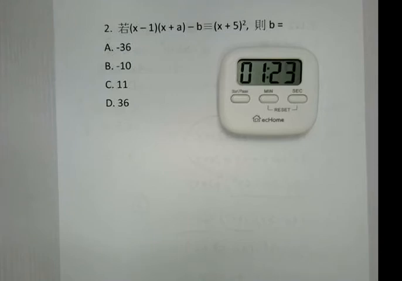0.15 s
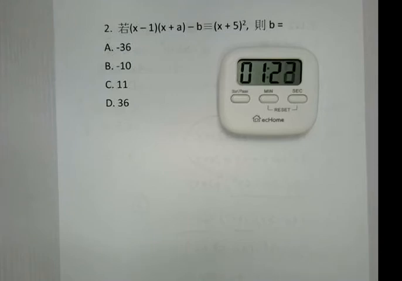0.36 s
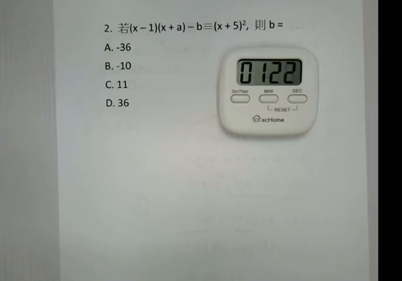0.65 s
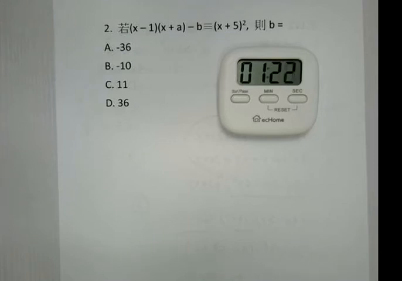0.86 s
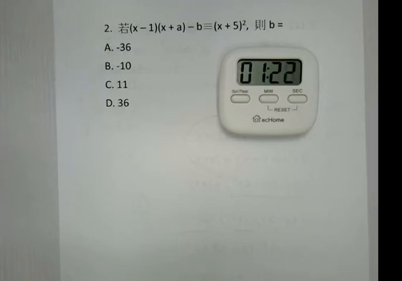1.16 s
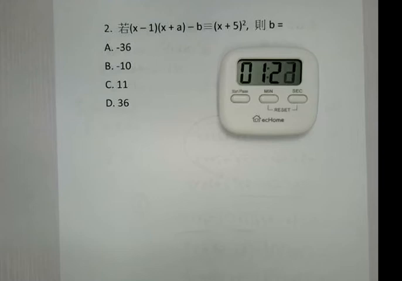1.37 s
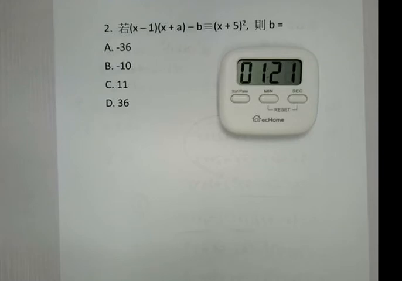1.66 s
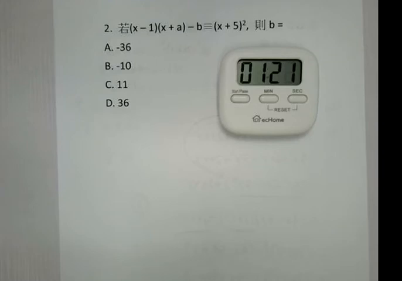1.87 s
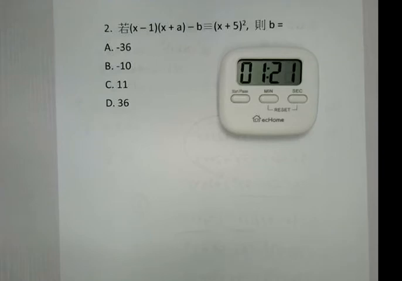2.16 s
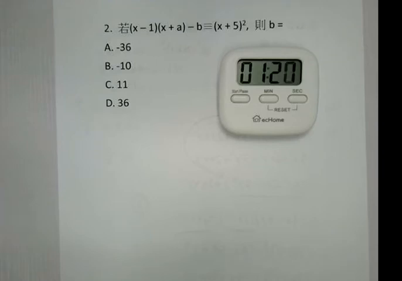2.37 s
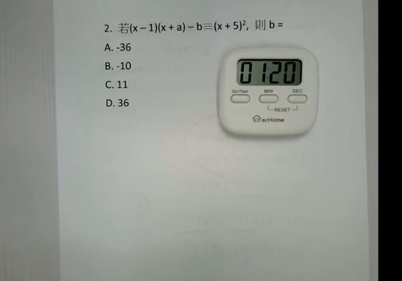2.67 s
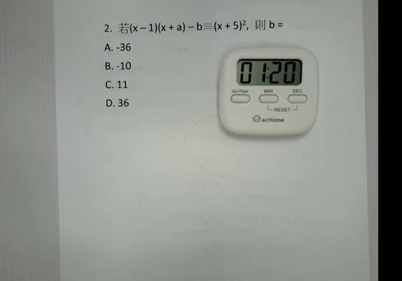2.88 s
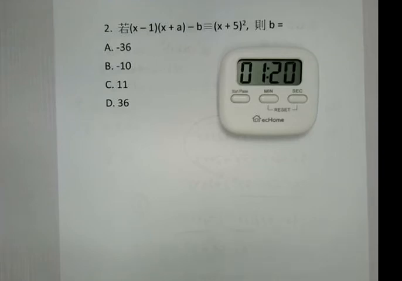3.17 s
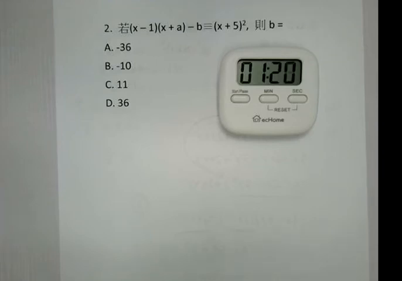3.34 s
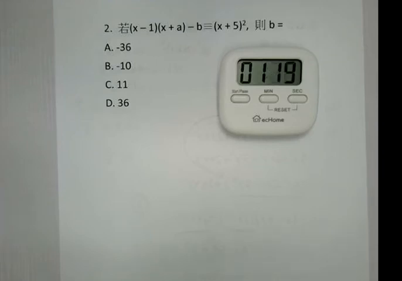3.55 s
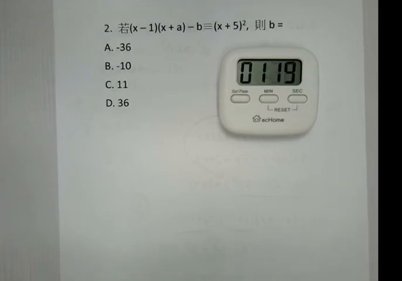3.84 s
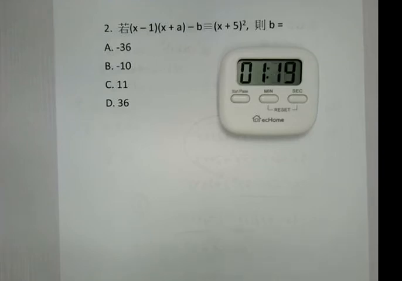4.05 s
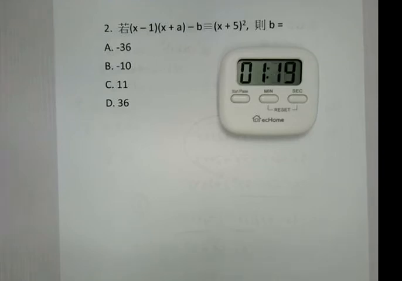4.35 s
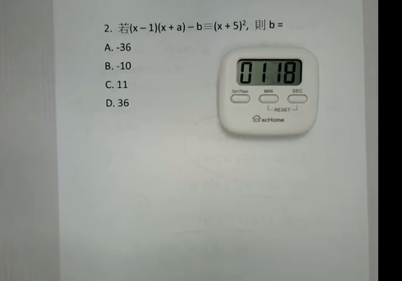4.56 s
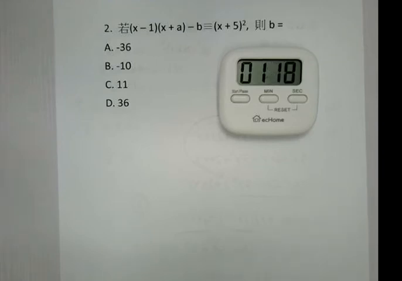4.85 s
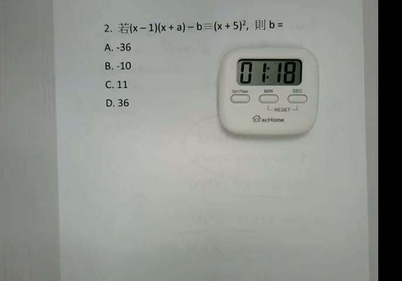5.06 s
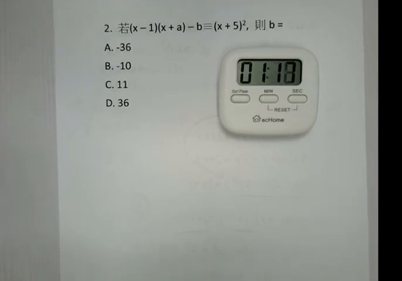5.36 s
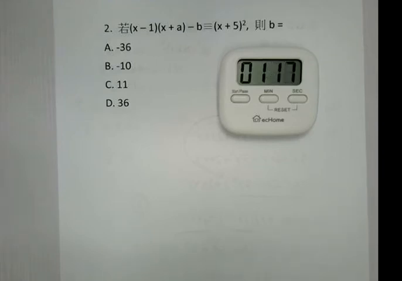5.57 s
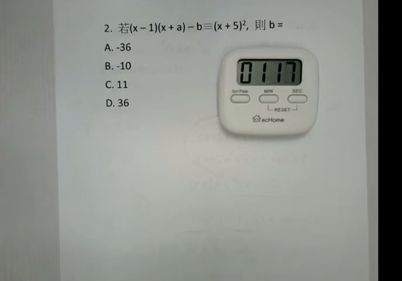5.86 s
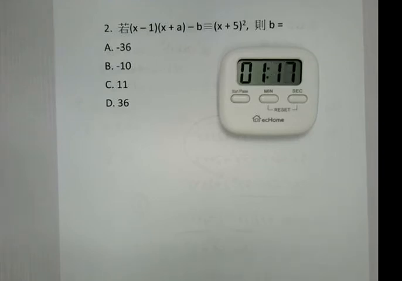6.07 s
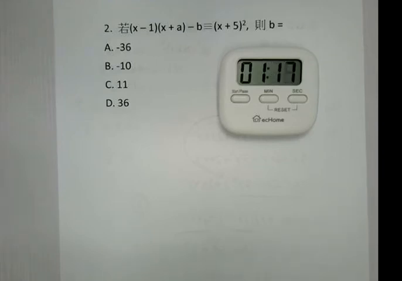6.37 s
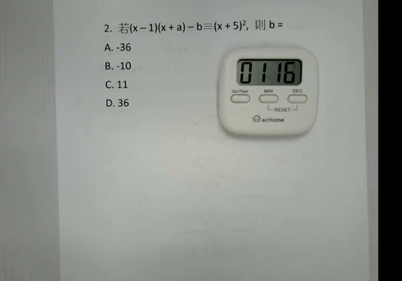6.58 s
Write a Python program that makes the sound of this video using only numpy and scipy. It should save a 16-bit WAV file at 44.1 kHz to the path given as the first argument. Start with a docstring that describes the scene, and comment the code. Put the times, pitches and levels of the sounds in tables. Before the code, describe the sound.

Quiet room heard through a plain single microphone with slight hiss. A constant deep mains hum dominates, edged by a weak raspy buzz and mixed with low, rumbling air noise. Past the middle, a soft tick is followed by a brief flurry of hard little clicks, like a small object or switch being nudged nearby, with very little room tail. Then only the steady hum and airy background remain, until a very faint tick at the close.

```python
"""A mains appliance hums and buzzes steadily in a quiet room, over a low rush of air and an even microphone
hiss. The hum is a stack of sine tones at multiples of the mains frequency; the buzz is short knocks in each
mains cycle. A few small clicks sound close by, most in one quick cluster: damped rings with a snap of noise and
a softer ring just after. There is one faint, high, rising squeak. The air and the hiss are random noise given a
tone colour."""
import sys
import numpy as np
from scipy import signal
from scipy.fft import rfft, irfft
from scipy.io import wavfile

SR = 44100
rng = np.random.default_rng(int(sys.argv[2]) if len(sys.argv) > 2 else 0)


def inscribe(sig):
    """Save sig as 16-bit PCM at rate SR to the path in sys.argv[1].

    A 1-D sig is mono; a 2-D sig holds one channel per row.
    Samples are clipped to [-1, 1] before scaling.
    """
    pcm = np.round(np.clip(np.atleast_2d(sig).T, -1, 1) * 32767)
    wavfile.write(sys.argv[1], SR, pcm.astype(np.int16))


N = 296352  # length in samples
TIME = np.arange(N) / SR  # seconds
FREQS = np.fft.rfftfreq(N, 1 / SR)  # Hz

MAINS_HZ = 49.964
CYCLE_START_S = .0122  # a mains cycle starts here


def amp(db):
    """Turns decibels into a gain."""
    return 10 ** (np.asarray(db) / 20)


def unit(x):
    """Scales a sound to an average strength (rms) of 1."""
    return x / np.sqrt(np.mean(x ** 2) + 1e-20)


def spectrum(points):
    """Joins (Hz, dB) points into a curve, with frequency spaced by its logarithm."""
    hz, db = np.transpose(points)
    return np.interp(np.log(FREQS + 1), np.log(hz), db)


def coloured(x, db):
    """Filters a sound by a dB curve and scales it to rms 1."""
    return unit(irfft(rfft(x) * amp(db), N))


def add(mix, start_s, sound):
    """Mixes a sound in at a given time, cutting it off where the mix ends."""
    part = mix[round(start_s * SR):][:len(sound)]
    part += sound[:len(part)]


def drift(rate_hz):
    """Wanders slowly at random, as noise with only its lowest frequencies left; rms 1."""
    noise = rfft(rng.standard_normal(N))
    return unit(irfft(noise * np.exp(-(FREQS / rate_hz) ** 2), N))


def hum(waver_db=0.36, waver_hz=6.1, lag_s=.0034, scatter_turns=0.008):
    """Two firm low tones follow the mains; the panel tones above crest near each knock and waver a little."""
    # Tones of the hum. Each row: multiple of the mains frequency, level in dB rms.
    hum_tones = [(1, -37.5), (2, -37.5), (4, -48.5), (6, -60), (8, -64), (10, -72.5), (13, -65.5),
                 (14, -62), (16, -67), (17, -71), (18, -72), (19, -77.5), (20, -67.5), (22, -75.5),
                 (23, -79.5), (24, -72.5), (25, -80.5), (26, -82)]
    out = np.zeros(N)
    for order, db in hum_tones:
        order = round(order)
        turns = order * MAINS_HZ * (TIME - CYCLE_START_S)
        if order <= 2:
            out += amp(db) * np.sin(2 * np.pi * turns)
        else:
            # the room scatters the phases of high tones more than those of low ones
            turns += order * (scatter_turns * rng.standard_normal() - MAINS_HZ * lag_s)
            level = amp(db + waver_db * drift(waver_hz))
            out += level * np.cos(2 * np.pi * turns)
    return np.sqrt(2) * out  # a sine of peak sqrt(2) has rms 1


def buzz(level_db=-68.5):
    """The iron core gives a double knock in each half cycle; the two halves are not quite alike."""
    # Knocks of the core. Each row: seconds after the mains cycle starts, strength (a plain factor, with sign).
    core_knocks = [(.00315, -.5), (.0041, 1), (.01325, -.5), (.0141, .85)]
    # Colour of the buzz. Each row: frequency in Hz, relative strength in dB per Hz.
    buzz_colour = [(900, -26), (1300, -4.5), (1650, -5), (1800, 1.5), (2000, 3.5), (2300, -4), (3000, -6),
                   (4200, -11), (7000, -16.5), (10000, -21), (15000, -27)]
    pulses = np.zeros(N)
    for delay_s, strength in core_knocks:
        # distance to the nearest knock, in cycles and then in samples
        cycles = (MAINS_HZ * (TIME - CYCLE_START_S - delay_s) + .5) % 1 - .5
        samples = cycles * SR / MAINS_HZ
        # a smooth spike that may fall between two samples
        pulses += strength * np.sinc(samples) * np.exp(-(samples / 10) ** 2)
    return amp(level_db) * coloured(pulses, spectrum(buzz_colour))


def clicks(dull_db=-3.0, tail_db=-21, tail_t60_s=0.14):
    """Each click is a main ring followed by a duller, slightly higher ring, with a faint room tail that dies
    away."""
    # Each row: start in seconds, level of the main ring in dB, pitch in Hz, time to the crest in seconds,
    # bright ring in dB and noisy snap in dB, both relative to the main ring.
    click_rows = [(3.963, -54, 1940, 0.0027, -20, -14), (4.5805, -49.5, 1900, 0.0018, -22, -14),
                  (4.647, -63, 2320, 0.0027, 0, -3), (4.6982, -36.5, 1534, 0.0026, -23, -20.5),
                  (4.741, -51, 1620, .0014, -20, -16), (4.7639, -49, 2450, 0.0023, 0, -8),
                  (4.7774, -49.5, 2530, 0.0021, 1.5, 0.5), (4.791, -36.5, 2680, 0.0011, -9, -17),
                  (6.505, -59, 5800, .0015, -2, -4)]
    # a slightly higher ring follows each click
    after_s, after_crest_s, after_pitch = .0045, 0.0026, 1.025
    # it is softer, and stays small even after a hard click
    after_db, after_top_db = -1, -50.5
    out = np.zeros(N)
    for start_s, db, hz, crest_s, bright_db, snap_db in click_rows:
        add(out, start_s, amp(db) * contact(hz, crest_s, bright_db, snap_db))
        after = contact(hz * after_pitch, after_crest_s, bright_db + dull_db, snap_db + dull_db)
        after_level = amp(min(db + after_db, after_top_db))
        add(out, start_s + after_s, after_level * after)
    # the room tail is noise that fades by 60 dB in tail_t60_s
    late = TIME[:SR // 4]
    tail = rng.standard_normal(len(late)) * amp(-60 * late / tail_t60_s)
    tail /= np.linalg.norm(tail)
    return out + amp(tail_db) * signal.fftconvolve(out, tail)[:N]


def contact(hz, crest_s, bright_db, snap_db):
    """A few cycles of a main ring and a bright ring, started by a snap of noise."""
    # Colour of the snap. Each row: frequency in Hz, relative strength in dB per Hz.
    snap_colour = [(1000, -14), (3200, 4), (5000, -0.5), (6500, -11), (8100, -0.5), (10000, -17),
                   (15000, -19)]
    # the bright ring and the snap come and go this many times faster than the main ring
    bright_speed, snap_speed = 1.16, 2.5
    t = TIME[:SR // 20]
    u = snap_speed * t / crest_s
    noise = coloured(rng.standard_normal(N), spectrum(snap_colour))[:len(t)]
    snap = u * np.exp(1 - u) * noise
    bright_hz = min(2.29 * hz, 4977)  # follows the pitch, up to a ceiling
    bright = ring(t, bright_hz, crest_s / bright_speed)
    return ring(t, hz, crest_s) + amp(bright_db) * bright + amp(snap_db) * snap


def ring(t, hz, crest_s):
    """A short burst of a tone whose strength swells to 1 at its crest and is quickly damped."""
    u = t / crest_s
    return u * np.exp((1 - u ** 2) / 2) * np.sin(2 * np.pi * hz * t)


def squeak(start_s=1.89, length_s=.085, peak_db=-71, start_hz=12500, rise_hz_per_s=9000):
    """One faint thin whistle swells and fades as it glides up."""
    t = np.clip(TIME - start_s, 0, length_s)
    hz = start_hz + rise_hz_per_s * t
    swell = np.sin(np.pi * t / length_s)  # silent before and after
    return amp(peak_db) * swell * np.sin(2 * np.pi * np.cumsum(hz) / SR)


def air(level_db=-47.0):
    """Moving air makes a noisy rush, and rumbles in a few low resonances; two weaker ones lie higher."""
    # Colour of the rush. Each row: frequency in Hz, relative strength in dB per Hz.
    air_colour = [(10, -7), (22, 0.5), (35, -2), (70, -8), (125, -1.5), (165, -3), (290, -3.5), (400, -7.5),
                  (520, -9), (760, -13), (900, -13.5), (1200, -19), (2000, -26), (5000, -39)]
    # Resonances that the air excites. Each row: frequency in Hz, width in Hz, lift in dB.
    air_booms = [(23.1, 5.1, 12), (194.5, 10.2, 14.5), (242.4, 25, 12), (271.8, 11.8, 8), (356, 14, 5),
                 (1462, 6, 11.5), (1540, 120, 1.5)]
    lift_db = sum(db / (1 + (2 * (FREQS - hz) / width_hz) ** 2) for hz, width_hz, db in air_booms)
    return amp(level_db) * coloured(rng.standard_normal(N), spectrum(air_colour) + lift_db)


def hiss(level_db=-65):
    """The microphone adds an even noise of its own."""
    # Colour of the hiss. Each row: frequency in Hz, relative strength in dB per Hz.
    hiss_colour = [(100, -8), (3000, 0.5), (6000, -1), (10000, -2), (15500, -2.5)]
    return amp(level_db) * coloured(rng.standard_normal(N), spectrum(hiss_colour))


def scene():
    """Adds up all sources at one microphone."""
    return (hum() + buzz() + clicks() + squeak() + air() + hiss())[None]


def record(dry, cutoff_hz=15520):
    """The recorder steeply removes everything above its band limit."""
    taps = signal.firwin(1023, cutoff_hz, window=("kaiser", 9), fs=SR)
    return signal.oaconvolve(dry, taps[None], "same")


dry = scene()
out = record(dry)
inscribe(out)
```